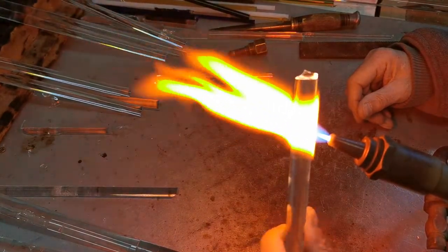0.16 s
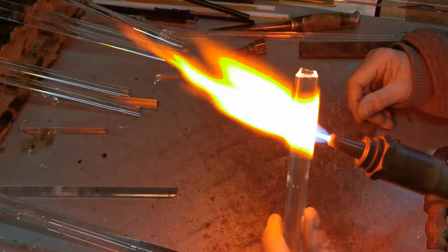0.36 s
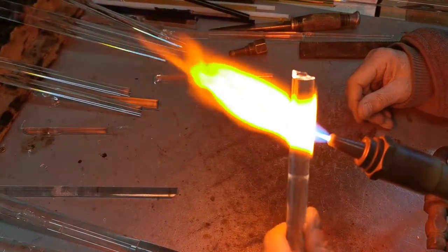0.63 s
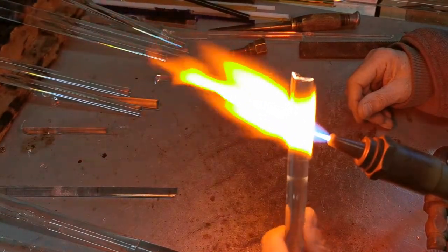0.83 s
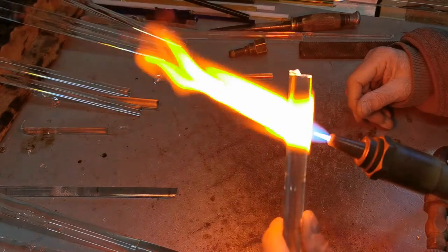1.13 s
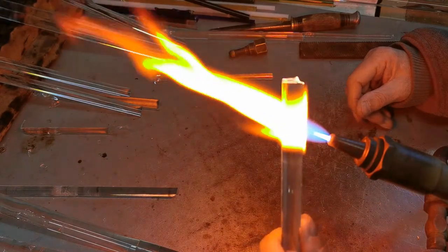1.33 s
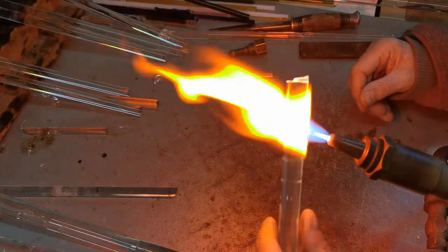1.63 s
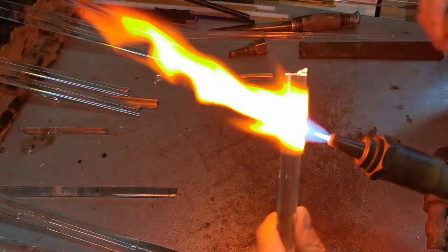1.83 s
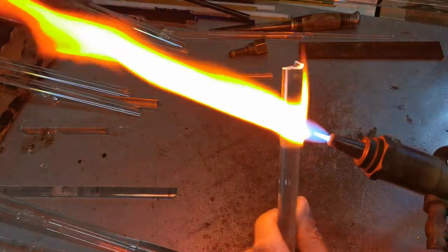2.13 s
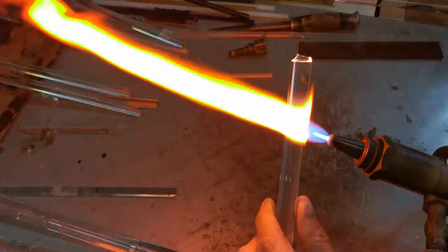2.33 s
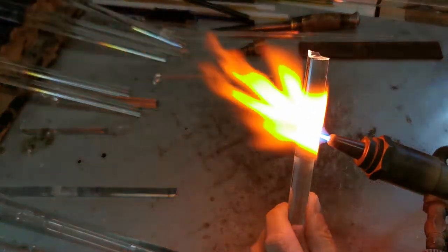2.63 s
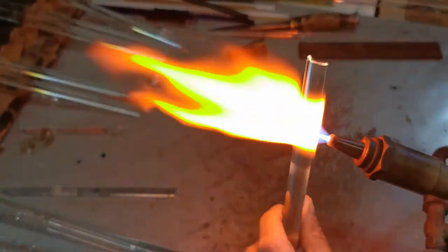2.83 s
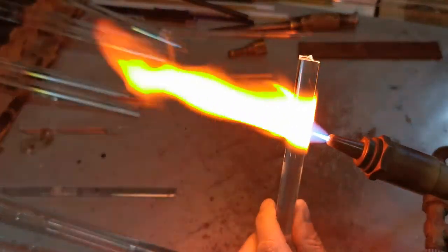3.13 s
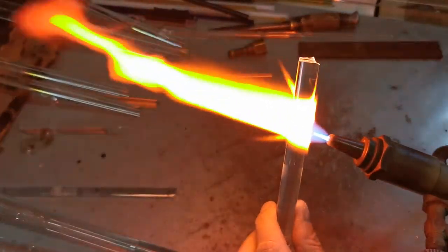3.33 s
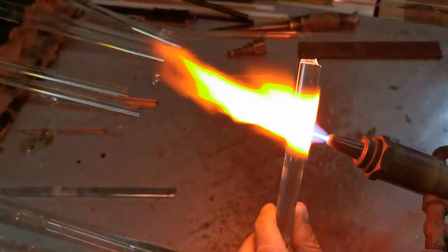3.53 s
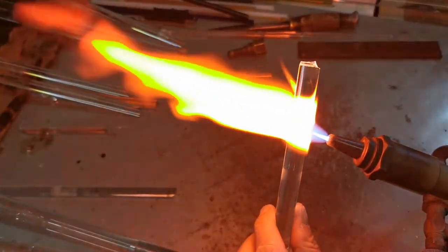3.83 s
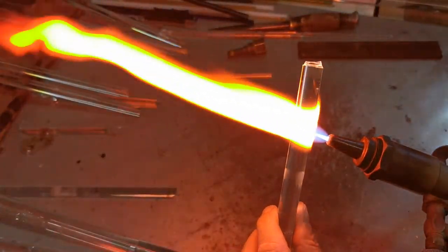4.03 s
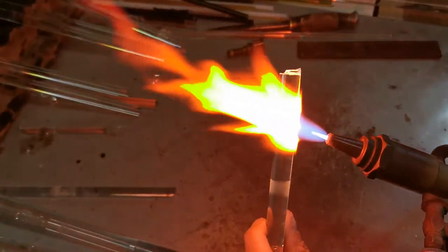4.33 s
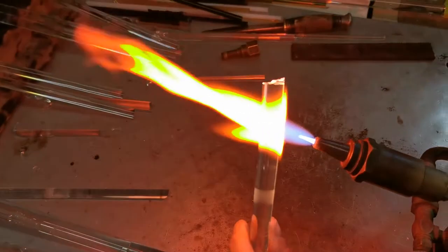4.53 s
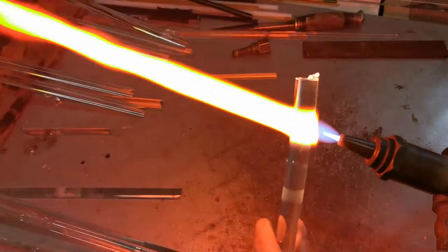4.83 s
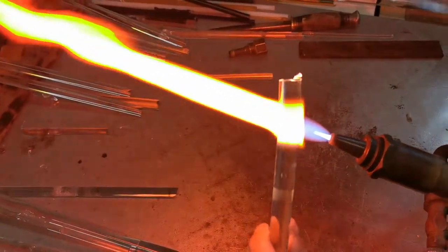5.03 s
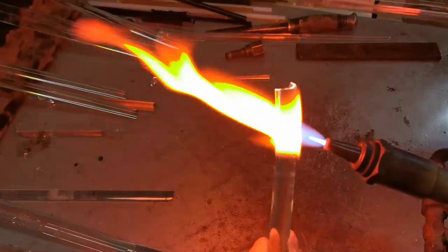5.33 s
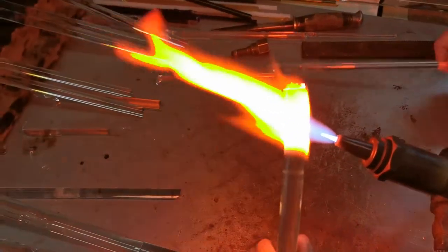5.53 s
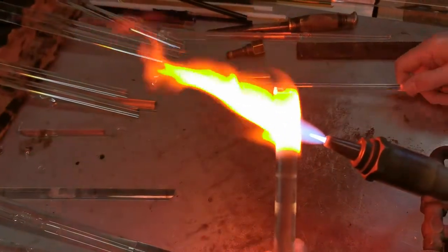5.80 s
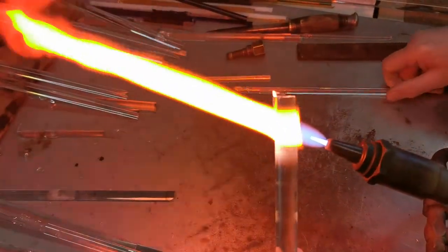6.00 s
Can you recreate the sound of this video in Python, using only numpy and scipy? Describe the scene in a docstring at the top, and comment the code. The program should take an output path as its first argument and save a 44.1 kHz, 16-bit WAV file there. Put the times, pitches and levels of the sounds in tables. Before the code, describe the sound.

A gas torch burns with a thin, high hiss and a faint low roar that flutters now and then. A glass rod slides with a sharp click and a brief, piercing squeal. Rods in a pile then clink, rattle and scrape, with dull bumps on a steel bench. Near the end one rod is laid down with a clack and a small ringing bounce. The sound is close and in stereo, in a small workshop.

```python
"""Glass rods are handled on a steel bench: a hand reaches into the pile, one rod squeals by stick-slip as
it slides and clinks, the pile rattles and scrapes, and the rod is laid down with a clack and a bounce.
Behind them a gas torch hisses against a glass tube, its flame roaring low and fluttering on the tube.
The two microphone ports are coloured differently: the left is bright, the right peaks near 7 kHz."""
import sys
import numpy as np
from scipy import signal
from scipy.fft import rfft, irfft, next_fast_len
from scipy.io import wavfile
from scipy.ndimage import uniform_filter1d

SR = 44100
rng = np.random.default_rng(int(sys.argv[2]) if len(sys.argv) > 2 else 0)


def generate_wav(sig):
    """Save sig (samples, or channels by samples) to the path in sys.argv[1] as 16-bit PCM at SR."""
    pcm = np.round(np.clip(np.atleast_2d(sig).T, -1, 1) * 32767).astype(np.int16)
    wavfile.write(sys.argv[1], SR, pcm)


N = 271700
T = np.arange(N) / SR

def from_db(db):
    """Decibels to gain."""
    return 10 ** (np.asarray(db) / 20)

def unit_rms(x):
    """Scale to unit rms."""
    return x / np.sqrt(np.mean(x ** 2) + 1e-20)

def automation(rows, outside=None):
    """One lane per column, with straight lines between the breakpoints."""
    times, *columns = np.transpose(rows)
    return [np.interp(T, times, column, outside, outside) for column in columns]

def at_hz(points, hz, column=1):
    """Read a curve on a log-frequency axis."""
    points = np.array(points)
    return np.interp(np.log(hz), np.log(points[:, 0]), points[:, column])

def eq(x, gain_at):
    """Filter by a gain that depends on frequency."""
    size = next_fast_len(x.shape[-1])
    hz = np.maximum(np.arange(size // 2 + 1) * SR / size, 1)
    return irfft(rfft(x, size) * gain_at(hz), size)[..., :x.shape[-1]]

def drift(rate_hz):
    """Random modulator of unit rms, moving up to about this rate."""
    steps = rng.standard_normal(int(N / SR * rate_hz * 2) + 2)
    return unit_rms(np.interp(T * rate_hz * 2, np.arange(len(steps)), steps))

def bell(hz, centre_hz, width_hz):
    """Gain of a resonance passed twice: steep skirts."""
    return 1 / (1 + (2 * (hz - centre_hz) / width_hz) ** 2)

def blend(alike):
    """Gains of shared and independent noise for a stereo likeness of 0-1."""
    return np.sqrt(alike), np.sqrt(1 - alike)

def port_noise(size, alike=0.16):
    """Wide stereo noise, partly alike at the two ports."""
    left, other = rng.standard_normal((2, size))
    shared, own = blend(alike)
    return np.array([left, shared * left + own * other])

# Torch automation: (time [s], left hiss trim [dB], roar level [dB])
TORCH = [(0, 3, -61.5), (.3, 5, -61.5), (.7, -1, -62), (1.2, 0, -63), (2.5, 0, -59), (2.7, -2, -71.5),
         (3.1, -7.5, -69), (3.8, -8, -59), (4.35, -13, -65), (4.56, -4, -63), (4.75, -14, -65.5),
         (5.0, -11, -59), (5.3, -14, -64), (5.7, -11.5, -63), (6.16, -21, -67)]
# Tone of the roar: (frequency [Hz], gain [dB])
ROAR_EQ = [(15, -34), (25, -8), (145, -5.5), (193, -7.5), (215, -26), (248, -7), (286, -1.5), (432, -7.5),
           (475, -17.5), (514, -9), (622, -14.5), (1100, -34.5), (1430, -46), (2420, -120)]
# Stereo image of the roar: (frequency [Hz], left minus right [dB], likeness [0-1])
ROAR_IMAGE = [(60, 1.5, 0.84), (296, -1, 0.92), (450, 5, 0.37), (785, 13, 1), (1190, -8, 0.067)]
def flame_roar():
    """Burning gas makes a low, unsteady bed of noise."""
    common, other = rng.standard_normal((2, N))
    tone = lambda f: from_db(at_hz(ROAR_EQ, f))
    pan = lambda f: from_db(at_hz(ROAR_IMAGE, f) / 2)
    mix = lambda f: blend(at_hz(ROAR_IMAGE, f, column=2))
    left = eq(common, lambda f: tone(f) * pan(f))
    right = eq(common, lambda f: tone(f) / pan(f) * mix(f)[0])
    right += eq(other, lambda f: tone(f) / pan(f) * mix(f)[1])
    _, roar_db = automation(TORCH)
    return unit_rms(np.array([left, right])) * from_db(roar_db + 0.89 * drift(12))

# Flutter envelope: (time [s], level [dB])
FLUTTER = [(1.9, -95), (2.1, -60), (2.37, -62.5), (2.41, -43.5), (2.48, -61), (2.7, -71), (3.1, -82),
           (3.55, -72), (3.74, -56.5), (4.07, -71.5), (4.16, -52), (4.25, -79), (4.56, -63), (4.72, -69),
           (4.96, -55), (5.14, -60), (5.25, -75), (5.89, -65.5), (6.05, -77), (6.13, -56.5), (6.16, -63)]
def flame_flutter(pan_right_db=3.5, lumps_db=3):
    """The flame breaks on the tube and flutters; a deep rumble follows part of the swing."""
    flutter = eq(rng.standard_normal(N), lambda f: bell(f, centre_hz=138.7, width_hz=56))
    rumble = eq(rng.standard_normal(N), lambda f: bell(f, centre_hz=51.6, width_hz=86))
    flutter_db, = automation(FLUTTER, outside=-100)
    swing_db = flutter_db + 60.5   # about the usual flutter level
    rumble_db = -70 + .6 * swing_db + lumps_db * drift(3.3)
    flutter_db += lumps_db * drift(11)
    mono = unit_rms(flutter) * from_db(flutter_db) + unit_rms(rumble) * from_db(rumble_db)
    return mono * from_db([[-pan_right_db / 2], [pan_right_db / 2]])

# Resonant bands of the jet: (centre [Hz], width [Hz], left level [dB], right level [dB],
# share of the left hiss trim [0-1], stereo likeness [0-1])
HISS_BANDS = [(3300, 1500, -80, -82.5, 0.2, 0.8), (4238, 170, -66.5, -69.5, 0.37, 0.48),
              (4370, 100, -67, -71.5, 0.3, 0.35), (5820, 580, -73, -74, 1, 1),
              (7200, 700, -79.5, -67.5, 0.7, 0.6), (7240, 280, -88, -81.5, .3, 0.2),
              (8400, 250, -109, -106, 0.5, 0), (8350, 370, -66.5, -89, 0.67, 0),
              (9180, 230, -66.5, -92, 0.84, 0.02), (10770, 1000, -55.5, -105, 0.97, 0),
              (11330, 340, -52.5, -76.5, 0.6, 0.04), (11700, 320, -62, -73.5, 1, 0.3),
              (12340, 610, -59, -73, 0.9, 0.4), (13000, 400, -82, -86, 1, .5),
              (14700, 450, -70.5, -69.5, 0.6, .52), (14800, 700, -59, -74, 0.9, 0),
              (15940, 150, -49, -55, 0.8, 0.3)]
def gas_hiss(air_db=-72.5, whistle_top_hz=5000):
    """The jet's noise rings the resonances of nozzle, tube and ports, each flickering a little."""
    trim_db, roar_db = automation(TORCH)
    out = from_db(air_db) * rng.standard_normal((2, N))   # thin air between the bands
    gust_db = 1.74 * drift(3.3)
    swell_db = 0.41 * (roar_db - roar_db.mean())   # the whistling low bands ride the roar
    size = next_fast_len(N)
    white = rfft(rng.standard_normal((2, 2, size)))
    bins_hz = np.arange(size // 2 + 1) * SR / size
    for k, (hz, width_hz, left_db, right_db, share, alike) in enumerate(HISS_BANDS):
        source = white[k % 2]   # neighbours get unrelated noise
        left, other = irfft(source * bell(bins_hz, hz, width_hz), size)[:, :N]
        shared, own = blend(alike)
        band = unit_rms(np.array([left, shared * left + own * other]))
        flicker_db = gust_db + 1.14 * drift(8.7) + (hz < whistle_top_hz) * swell_db
        level_db = np.array([left_db + share * trim_db + flicker_db, right_db + flicker_db])
        out += band * np.repeat(from_db(level_db[:, ::32]), 32, axis=1)[:, :N]
    return eq(out, lambda f: (f > 900) * (f < 15750))

def room(dry, t60_s=0.26, wet_db=-10.5, damping_hz=8800):
    """Direct sound plus the workshop's short, dense reverb at each port."""
    t = np.arange(int(.5 * SR)) / SR
    tail = rng.standard_normal((2, len(t))) * from_db(-60 * t / t60_s) * (t > .003)
    tail = eq(tail, lambda f: 1 / np.sqrt(1 + (f / damping_hz) ** 2))
    tail = from_db(wet_db) * tail / np.sqrt(np.sum(tail ** 2, axis=1, keepdims=True))
    return dry + signal.fftconvolve(dry, tail, axes=1)[:, :N]

# Stereo balance of sounds from the bench: (frequency [Hz], left minus right [dB])
PORT_BALANCE = [(200, -5), (700, -1.5), (3000, 1.5), (4300, -3), (5600, 1.5), (7000, -10.5), (7800, -4),
                (8500, 16), (11000, 18), (13000, 10.5), (14000, 23), (16000, -1)]
def microphone_ports(sound, lag_s=0.000302, mono_below_hz=405):
    """The right port hears the bench later; both share the bass, and each has its own colour."""
    left, right = sound
    right = eq(right, lambda f: np.exp(-2j * np.pi * f * lag_s))
    right += eq(left - right, lambda f: 1 / (1 + (f / mono_below_hz) ** 2))
    pan = lambda f: from_db(np.array([[.5], [-.5]]) * at_hz(PORT_BALANCE, f))
    return eq(np.array([left, right]), lambda f: pan(f) / pan(f).mean(axis=0))

def bursts(cues, colour, pivot_hz, attack_s):
    """Noise hits with a fast attack and a dying tail, each tilted about the pivot."""
    out = np.zeros((2, N))
    for time_s, level_db, tilt, t60 in cues:
        start = int(time_s * SR)
        t = np.arange(min(int(t60 * SR), N - start)) / SR
        noise = port_noise(SR // 2)[:, :len(t)]
        noise = eq(noise, lambda f: from_db(at_hz(colour, f) + tilt * np.log2(f / pivot_hz + .01)))
        envelope = from_db(level_db - 60 * t / t60) * np.minimum(t / attack_s, 1)
        out[:, start:start + len(t)] += unit_rms(noise) * envelope
    return out

# Scrape cues: (time [s], hold [s], level [dB], treble trim [dB])
SCRAPES = [(.92, 0.066, -80, -14), (2.2, .45, -73, -3), (2.404, 0, -63.5, -13), (3.147, 0.03, -56.5, -3),
           (3.333, 0.02, -50.5, -8), (3.402, 0, -48, 6), (3.46, 0.22, -53.5, 0.5), (3.72, 0.18, -66.5, -2),
           (3.918, 0, -51, 0.5), (4.001, 0.0093, -50, -1.5), (4.174, 0.014, -56.5, -5.5),
           (5.79, 0.036, -58, -13), (5.934, 0.014, -65.5, -24), (6.036, 0, -61, -8),
           (6.07, 0.035, -67.5, -4.5)]
# Tone of the scrapes: (frequency [Hz], gain [dB])
SCRAPE_EQ = [(200, 10), (500, 0.5), (1500, 7), (3000, 4.5), (6000, 11), (10000, 4.5), (16000, -26)]
def scrapes(attack_db_per_s=702, release_db_per_s=180, crossover_hz=3500):
    """Sleeve and rods drag on the bench: strokes of dense, uneven grains."""
    grains = port_noise(N) * from_db(2.3 * drift(150))
    tone = lambda f: from_db(at_hz(SCRAPE_EQ, f))
    body = eq(grains, lambda f: tone(f) * (f < crossover_hz))
    treble = eq(grains, lambda f: tone(f) * (f >= crossover_hz))
    start, hold, level_db, treble_db = np.transpose(SCRAPES)[:, :, None]
    t = T[::32]
    attack_db = attack_db_per_s * (start - t).clip(0)
    release_db = release_db_per_s * (t - start - hold).clip(0)
    strokes_db = level_db - attack_db - release_db
    envelope = lambda db: np.interp(T, t, np.linalg.norm(from_db(db), axis=0))   # strokes add in power
    return (envelope(strokes_db) * body + envelope(strokes_db + treble_db) * treble) / np.std(body)

# Bump cues: (time [s], level [dB], tilt [dB/octave], t60 [s], low thud level [dB])
BUMPS = [(.93, -69, -1, 0.26, -85), (2.40, -54, 7, 0.074, -62), (2.965, -47, 6.5, 0.21, -74),
         (3.155, -52.5, 3.5, 0.46, -76), (3.195, -39, -1, 0.3, -47), (3.325, -41, 1.5, 0.34, -36),
         (3.40, -41.5, -3.5, 0.45, -52), (3.455, -48.5, -1.5, 0.46, -54), (3.565, -44.5, 3, 0.31, -57),
         (3.915, -64, 19, 0.17, -70), (4.17, -73, -14, .24, -70), (5.31, -66.5, 6, .15, -85),
         (5.443, -47, -0.6, 0.28, -52), (5.705, -43, 4.5, 0.16, -52), (5.775, -50.5, -10.5, 0.16, -62)]
# Tone of a bump: (frequency [Hz], gain [dB])
BUMP_EQ = [(71, -29), (120, 3.5), (668, -1.5), (729, -3.5), (820, -2.5), (1500, -12.5), (2220, -12.5),
           (3400, -31), (4000, -31), (5200, -55), (8800, -120)]
# Resonances of the bench top: (centre [Hz], width [Hz], boost [dB])
BENCH_MODES = [(220, 10, 4.5), (471, 21, 5), (685, 6.2, 11.5), (788, 12, 6), (1330, 37, 2.5),
               (1440, 110, 6), (2010, 230, 3.5), (2363, 53, 6.5), (2810, 55, 8), (3110, 29, 5.5)]
def handling(thud_t60_s=0.24):
    """Dull bumps of hand and sleeve ring the bench top, as do the scrapes; a thud underlies each bump."""
    bumps = bursts([row[:4] for row in BUMPS], BUMP_EQ, pivot_hz=700, attack_s=0.0089)
    bench = lambda f: 1 + sum((from_db(db) - 1) * bell(f, hz, width) for hz, width, db in BENCH_MODES)
    knocks = eq(bumps + scrapes(), bench)
    thuds = [(time_s, thud_db, 0, thud_t60_s) for time_s, *_, thud_db in BUMPS]
    thud_eq = [(60, -17), (110, -4), (150, -6.5), (230, 2), (350, -44.5)]   # (frequency [Hz], gain [dB])
    return knocks + bursts(thuds, thud_eq, pivot_hz=150, attack_s=0.017)

def glass_ring(hits, modes, spread_db, detune, rough_db):
    """A hit rings every mode, most near its focus pitch; loose contact detunes and roughens the ring."""
    hz, mode_db, t60 = np.transpose(modes)[:, :, None]
    t = np.arange(SR // 5) / SR
    fades = np.minimum(t / 0.00013, 1) * np.minimum((t[-1] - t) / .03, 1)
    out = np.zeros(N + SR)
    for time_s, level_db, focus_hz, rolloff in hits:
        level_jitter, pitch_jitter = rng.standard_normal((2, len(modes), 1))
        steps = rng.standard_normal((len(modes), len(t) // 128 + 1))
        wobble = uniform_filter1d(np.repeat(steps, 128, axis=1)[:, :len(t)], size=128)
        onset_db = level_db + mode_db + spread_db * level_jitter - rolloff * np.abs(np.log2(hz / focus_hz))
        envelopes = from_db(onset_db - 60 * t / t60 + rough_db * wobble)
        partials = np.sin(2 * np.pi * hz * (1 + detune * pitch_jitter) * t)
        start = int(time_s * SR)
        out[start:start + len(t)] += (envelopes * partials).sum(axis=0) * fades
    return out[:N]

# Modes of the pile: (frequency [Hz], level [dB], t60 [s])
PILE_MODES = [(1437, -5.5, 0.051), (2096, -5.5, 0.037), (2605, -13, 0.18), (4162, -6, 0.18),
              (6300, -7.5, 0.1), (6890, -6, 0.064), (7040, -26, 0.39), (7740, -13.5, 0.082),
              (8180, -8.5, 0.22), (8830, -8.5, 0.16), (9700, -15, 0.077), (9830, -12, 0.17),
              (10820, -4, 0.17), (11900, -9.5, 0.18), (12950, -12, 0.13), (14250, -17, 0.1),
              (15000, -10, .08)]
# Clink cues: (time [s], level [dB], focus [Hz], rolloff [dB/octave])
CLINKS = [(3.142, -36.5, 7100, 10), (3.275, -56, 4180, 1), (3.294, -37.5, 4370, 13),
          (3.3358, -48, 6720, 16), (3.3852, -37, 8300, 10), (3.3988, -31, 10700, 2.5),
          (3.4072, -29, 6900, 4), (3.442, -24.5, 11500, 10.5), (3.4494, -29.5, 10900, 18),
          (3.5003, -32.5, 11100, 4), (3.5656, -36.5, 8900, 5), (3.5733, -32, 11300, 29),
          (3.622, -37, 10700, 23), (3.662, -39.5, 10200, 7.5), (3.8887, -46, 9700, 0),
          (3.905, -37.5, 7200, 25), (3.93, -36, 1540, 18), (3.97, -53, 8640, 12), (4.003, -39, 7100, 1),
          (4.003, -35, 2120, 22), (4.0531, -44, 9900, 4), (4.1519, -40, 10400, 6), (4.171, -47, 2650, 16),
          (4.18, -61, 1450, 21)]
def pile_rattle():
    """Rods in the pile touch and ring."""
    return glass_ring(CLINKS, PILE_MODES, spread_db=2.5, detune=0.005, rough_db=4.0)

# Clack cues: (time [s], level [dB], tilt [dB/octave], t60 [s])
CLACKS = [(2.7108, -9, 11, 0.0095), (2.8313, -15.5, 11, 0.03), (2.9622, -35, -3.5, .01),
          (2.9625, -45.5, -1.5, 0.27), (3.992, -37, 6, 0.11), (4.002, -34.5, 0.5, 0.088),
          (5.7035, -19, 2.1, 0.062), (5.7725, -26.5, 1.5, 0.093), (5.9357, -64, -3, .06),
          (6.0355, -46.5, -2.5, 0.047)]
# Tone of a clack: (frequency [Hz], gain [dB])
CLACK_EQ = [(180, -43), (300, -2), (557, -26.5), (1500, -9), (2090, -16.5), (2880, -5), (3820, -17),
            (4230, -6.5), (6320, -6.5), (7100, -5), (7720, -5), (8390, -6), (9280, -6.5), (15600, -22.5),
            (16400, -33.5)]
def clacks(crack_db=-4, crack_tilt=2.0, crack_t60_s=0.0072):
    """Transients of glass hitting bench or glass, plus a tiny crack on each clink in the pile."""
    cracks = [(time_s, level_db + crack_db, crack_tilt, crack_t60_s) for time_s, level_db, *_ in CLINKS]
    return bursts(CLACKS + cracks, CLACK_EQ, pivot_hz=6700, attack_s=0.0017)

# Modes of the rod on the bench: (frequency [Hz], level [dB], t60 [s])
LAID_MODES = [(800, -25, 0.2), (1264, -13.5, 0.52), (1530, -16, 0.94), (2340, -33, 0.47),
              (2800, -15, 0.023), (3240, -19, 0.052), (4220, -3, 0.023), (5670, -10, 0.089),
              (6970, -12.5, 0.19), (8540, -4, 0.074), (10100, -17, .08), (10800, -15, 0.14),
              (11330, -3.5, .08), (12900, -9.5, .08), (14350, -24, .05)]
# Landing cues: (time [s], level [dB], focus [Hz], rolloff [dB/octave])
LANDINGS = [(5.446, -42, 810, 30), (5.667, -35, 2170, 36), (5.7037, -20.5, 8000, 8),
            (5.773, -34.5, 6000, 7), (5.936, -41, 2720, 15), (6.0355, -37.5, 2880, 16.5),
            (6.11, -57, 2280, 9)]
def laid_rod():
    """The rod rings as it is laid down and bounces."""
    return glass_ring(LANDINGS, LAID_MODES, spread_db=0.5, detune=0.0035, rough_db=7.5)

# Modes of the lifted rod: (frequency [Hz], level [dB], t60 [s])
LIFTED_MODES = [(3110, -27, 0.075), (6230, -16, 0.086), (7370, -26, 0.13), (9006, -18, 0.097),
                (11480, -5, 0.21), (12180, -10, 0.099), (12640, 6.5, 0.16), (15100, -24, .2),
                (15500, -16, .12), (15700, -8, .14)]
# Knock cues: (time [s], level [dB], focus [Hz], rolloff [dB/octave])
KNOCKS = [(2.831, -28.5, 11100, 1), (2.837, -35, 9000, .6)]
def lifted_rod():
    """The lifted rod is knocked and gives a bright ping."""
    return glass_ring(KNOCKS, LIFTED_MODES, spread_db=-0.5, detune=0.00086, rough_db=5.0)

# Grit envelope: (time [s], level [dB])
GRIT = [(2.712, -70), (2.716, -30), (2.74, -48), (2.775, -49), (2.79, -40), (2.815, -40), (2.829, -29.5),
        (2.846, -40), (2.86, -54), (2.90, -69)]
# Tone of the grit: (frequency [Hz], gain [dB])
GRIT_EQ = [(1500, -23.5), (3000, -17.5), (6000, -13), (9000, -3), (12000, 3), (13500, -18), (15500, -42)]
def grit():
    """Grit under the sliding rod makes a bright, grainy hiss."""
    grains = rng.standard_normal(N) * from_db(2.0 * drift(250))
    grains = eq(grains, lambda f: from_db(at_hz(GRIT_EQ, f)))
    level_db, = automation(GRIT, outside=-120)
    return unit_rms(grains) * from_db(level_db)

# Brief singing tones: (start [s], end [s], start pitch [Hz], end pitch [Hz], level [dB])
CHIRPS = [(2.53, 2.71, 7500, 7350, -55.5), (2.72, 2.737, 7340, 7200, -37),
          (2.779, 2.827, 7281, 7281, -31.5), (2.782, 2.816, 4160, 4220, -44),
          (2.783, 2.815, 15701, 15500, -39), (2.802, 2.822, 10900, 10900, -32),
          (2.832, 2.85, 7000, 6240, -31.5), (2.833, 2.852, 15691, 15500, -19),
          (2.834, 2.85, 3210, 3216, -43), (2.847, 2.887, 7371, 7390, -39), (2.85, 2.91, 15400, 15600, -49),
          (2.87, 3.14, 7310, 7460, -52.5), (2.85, 3.14, 11480, 11100, -60), (3.915, 4.0, 8320, 8200, -55),
          (4.17, 4.28, 775, 780, -65)]
def chirps():
    """Modes swell and glide for a moment while a rod slides or rolls."""
    out = np.zeros(N)
    roughness = from_db(3.6 * drift(200))
    for k, (start, end, first_hz, last_hz, level_db) in enumerate(CHIRPS):
        span = slice(int(start * SR), int(end * SR))
        progress = np.clip((T[span] - start) / (end - start), 0, 1)
        hz = last_hz + (first_hz - last_hz) * (1 - progress) ** 2
        swell = np.sqrt(np.sin(np.pi * progress).clip(0)) * from_db(level_db)
        out[span] += swell * np.roll(roughness, 9000 * k)[span] * np.sin(2 * np.pi * np.cumsum(hz) / SR)
    return out

# Lead squeal: (time [s], pitch [Hz], level [dB])
SQUEAL = [(2.711, 11400, -36), (2.715, 11200, -25), (2.725, 11500, -23), (2.74, 11550, -19.5),
          (2.765, 11580, -20), (2.792, 11555, -18), (2.80, 11400, -28.5), (2.826, 11570, -25),
          (2.832, 11300, -62)]
def squeal(beat_hz=33.5, twin_db=-8, rough_db=1.2):
    """Stick-slip keeps a mode of the sliding rod singing; a close twin mode beats against it."""
    hz, level_db = automation(SQUEAL)
    start, end = SQUEAL[0][0], SQUEAL[-1][0]
    phase = 2 * np.pi * np.cumsum(hz) / SR
    twin = from_db(twin_db) * np.sin(phase + 2 * np.pi * beat_hz * (T - start))
    envelope = from_db(level_db + rough_db * drift(300)) * (T > start) * (T < end)
    return (np.sin(phase) + twin) * envelope

def scene():
    """Bench sounds pass through the room and the ports; the torch is added as each port hears it."""
    glass = squeal() + chirps() + grit() + lifted_rod() + laid_rod() + pile_rattle()
    bench = microphone_ports(room(glass + handling() + clacks()))
    return bench + gas_hiss() + flame_roar() + flame_flutter()

def record(dry):
    """A steep low-pass takes off the very top."""
    return signal.sosfilt(signal.cheby2(20, 70, 17150, fs=SR, output="sos"), dry)

dry = scene()
out = record(dry)
generate_wav(out)
```